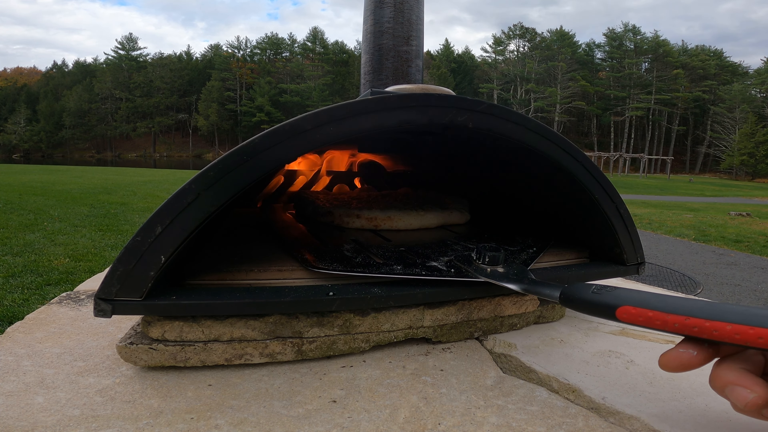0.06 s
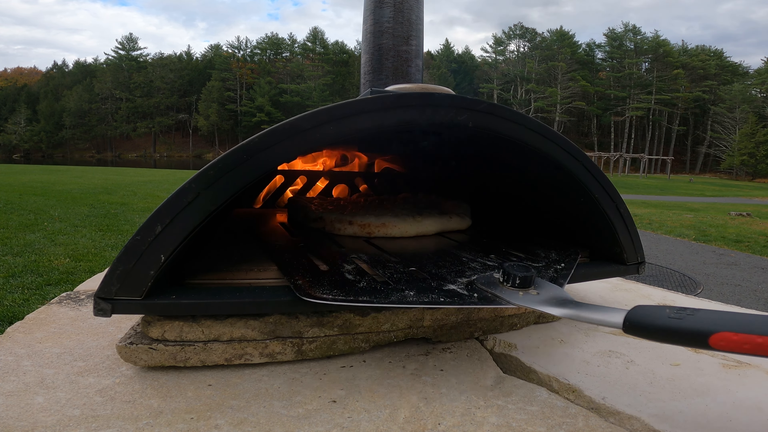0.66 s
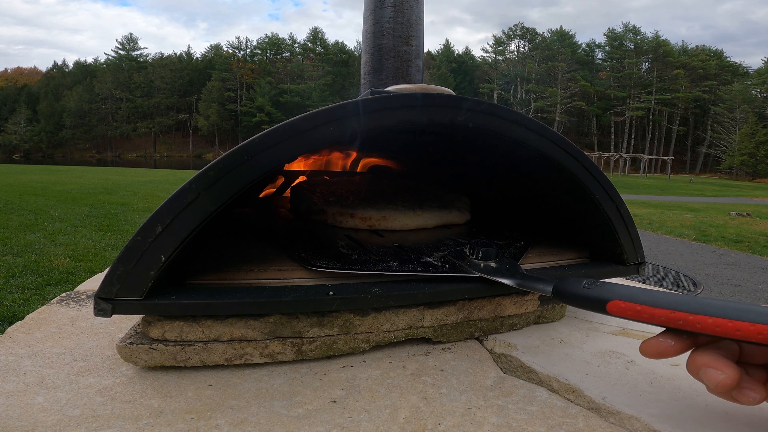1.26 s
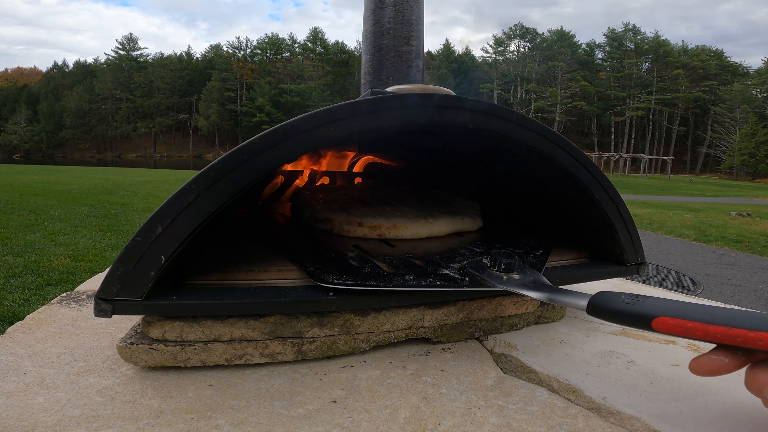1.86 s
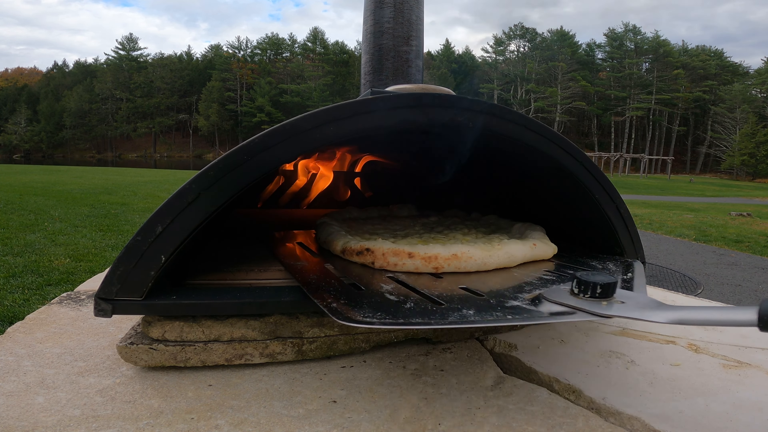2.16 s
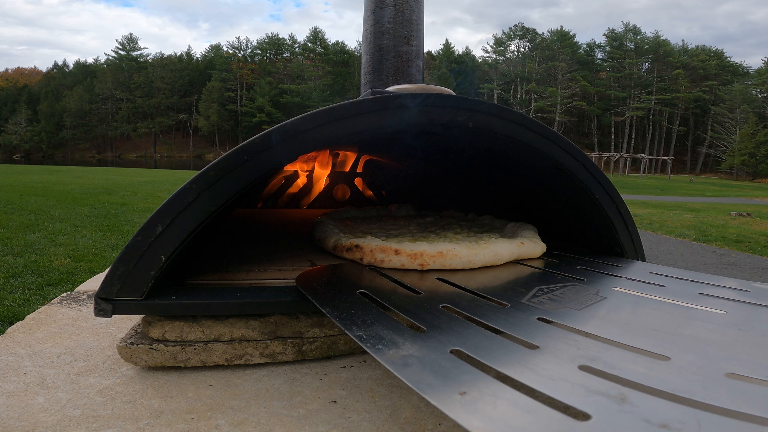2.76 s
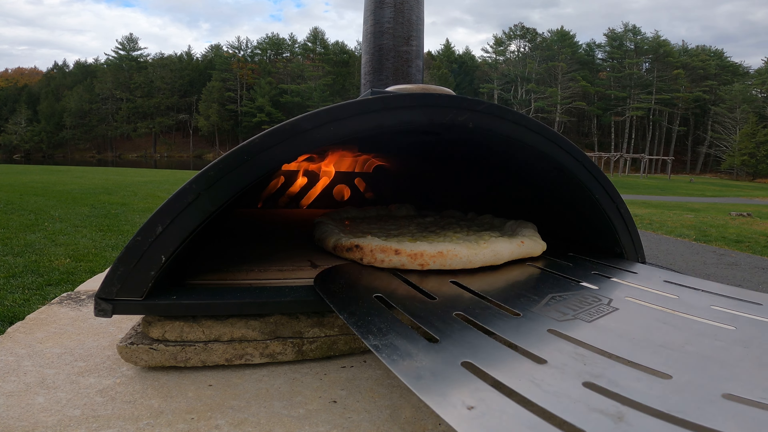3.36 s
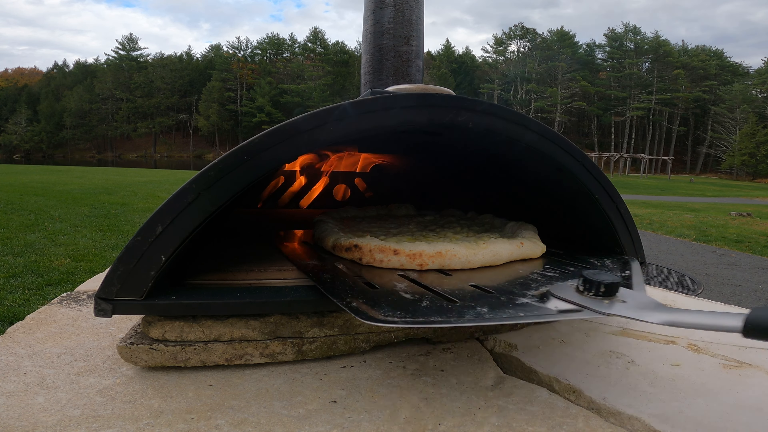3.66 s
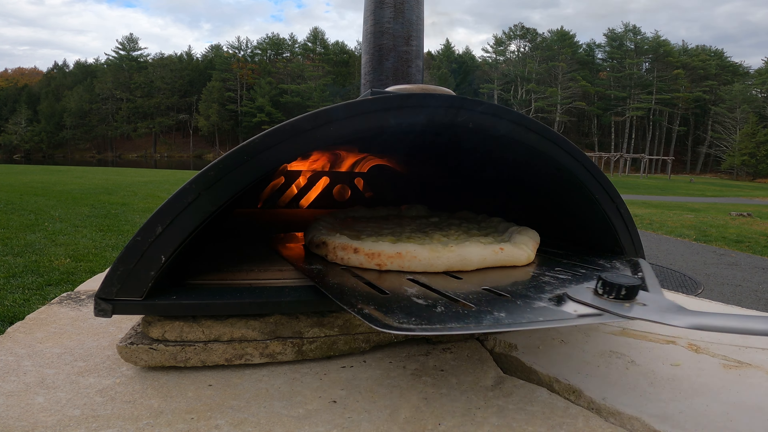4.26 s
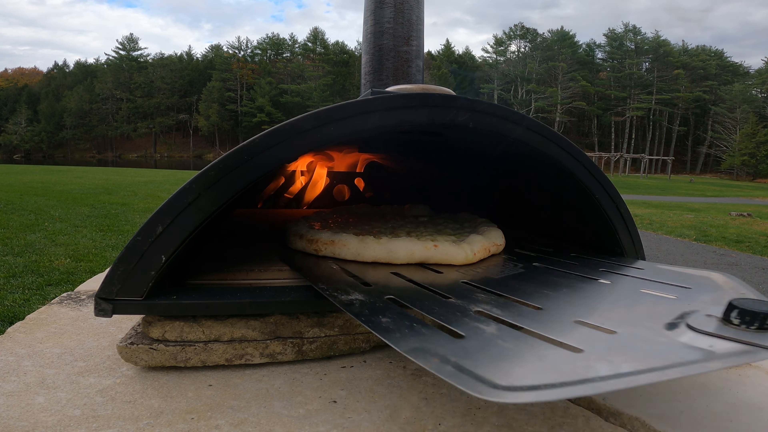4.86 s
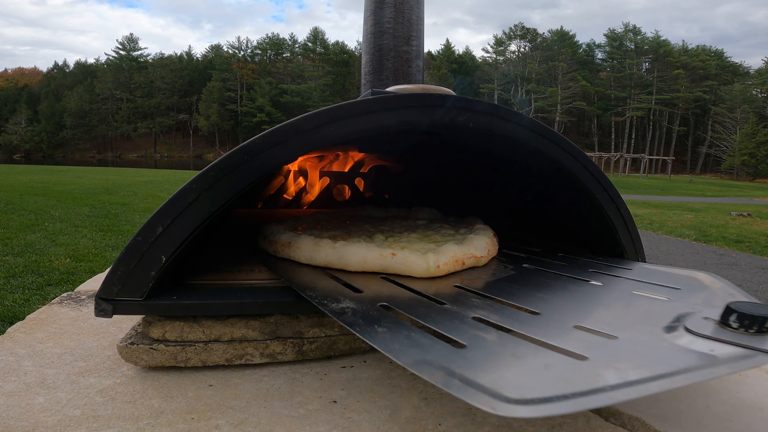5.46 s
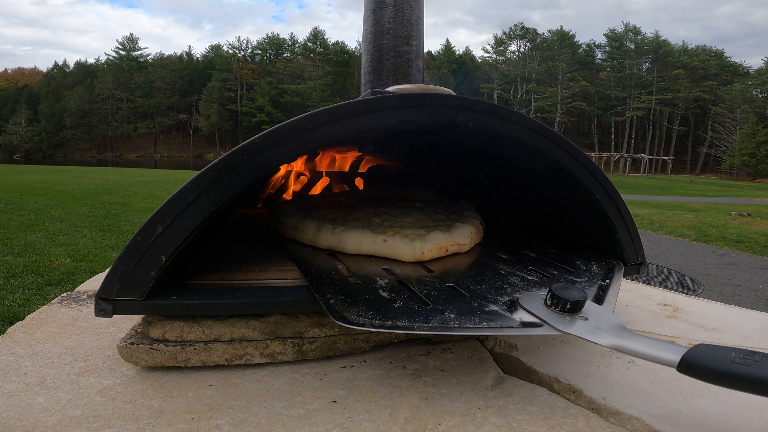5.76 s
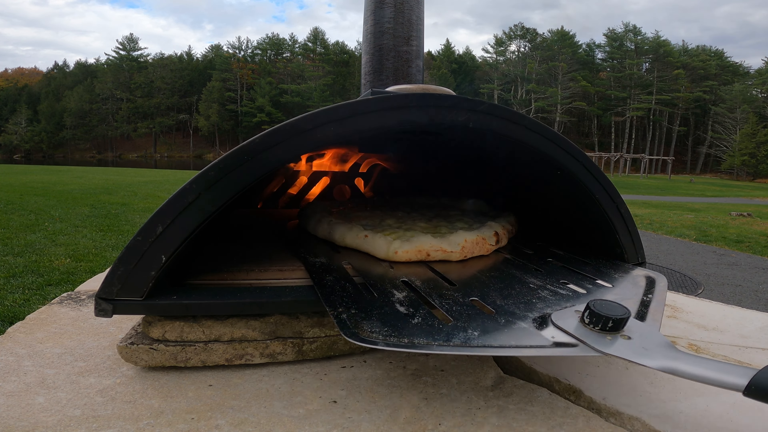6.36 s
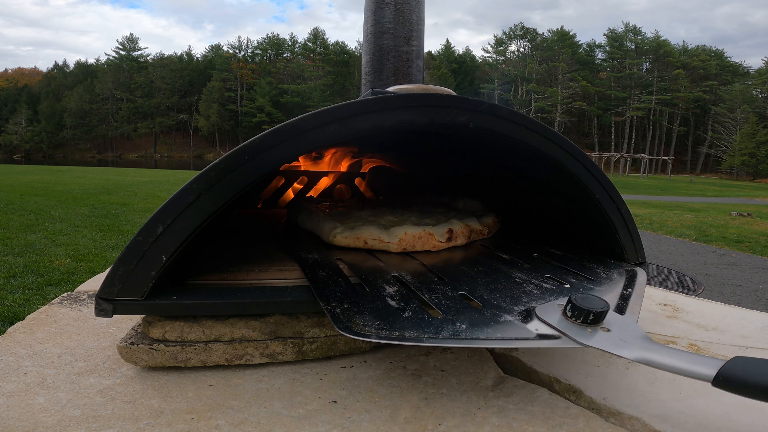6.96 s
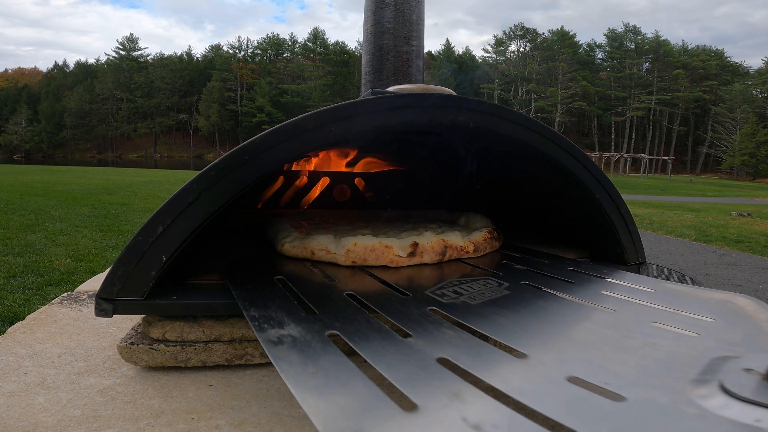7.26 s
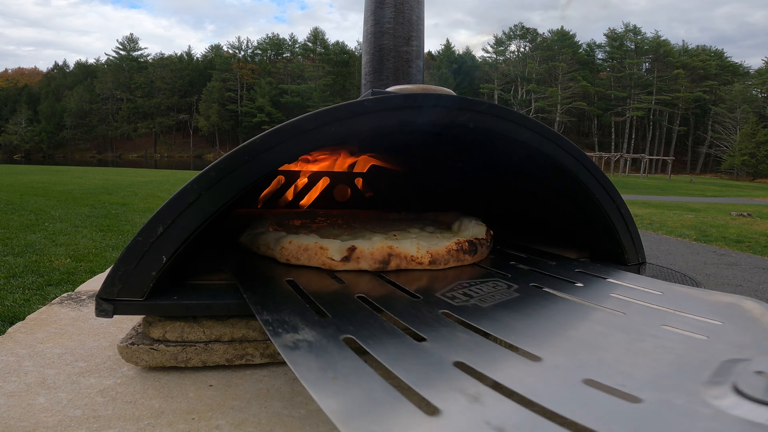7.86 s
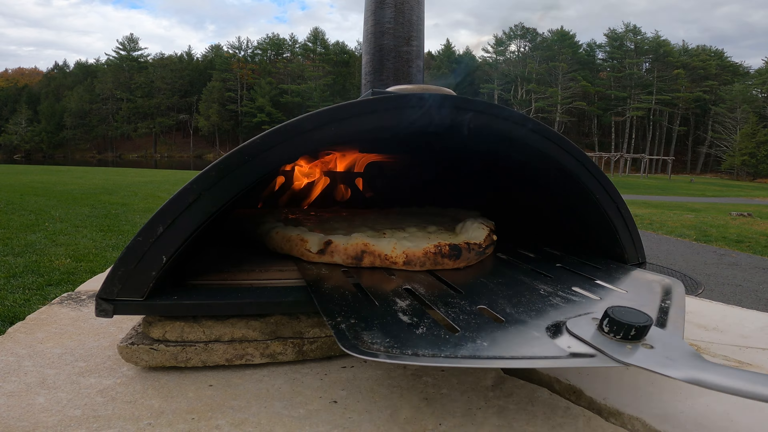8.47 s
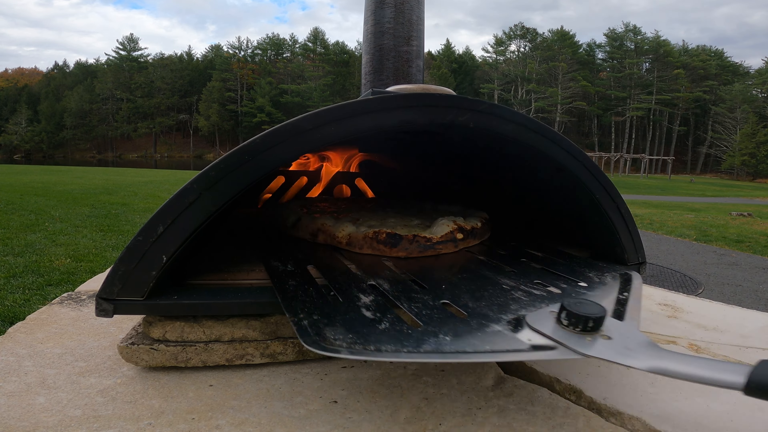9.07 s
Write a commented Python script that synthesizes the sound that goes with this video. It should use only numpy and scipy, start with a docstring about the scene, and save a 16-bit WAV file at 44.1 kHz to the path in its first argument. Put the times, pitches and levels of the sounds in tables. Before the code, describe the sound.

A metal pizza peel scrapes over gritty oven stone in repeated strokes, with clinks and thumps, over faint sizzling and a low burner.

```python
"""Outdoors at a small gas oven, a stereo microphone pair facing its mouth.
Straight ahead, a slotted metal peel is worked in and out, turning a pizza. The blade rasps over
the gritty stone, clinks on the oven mouth and thumps as blunt blows flex it. Between strokes
bubbles crackle on the pizza, the burner murmurs and light wind touches the microphones."""
import sys
import numpy as np
from scipy import signal
from scipy.fft import rfft, irfft
from scipy.io import wavfile

SR = 44100
rng = np.random.default_rng(int(sys.argv[2]) if len(sys.argv) > 2 else 0)


def to_wav(sig):
    """Store sig (one row per channel, or 1-D mono) as 16-bit WAV at the path in sys.argv[1].

    Samples outside -1..1 are clipped; the rate is SR.
    """
    pcm = np.clip(np.atleast_2d(sig), -1, 1) * 32767
    pcm = np.round(pcm).astype(np.int16)
    wavfile.write(sys.argv[1], SR, pcm.T)  # frames by channels


N = 401751
T = np.arange(N) / SR

# Pushes and pulls of the peel. Each row: start, fastest moment and end in seconds, speed at first
# touch from 0 to 1, then relative levels of rasp, grinding and shudder in dB.
STROKES = [(0.19, 0.21, 0.3, 0.4, -34.5, -43, -49.5), (0.359, 0.45, 1.2, 0.54, -38.5, -41.5, -34),
           (0.677, 0.821, 0.98, 0, -30.5, -37, -38), (0.932, 1.084, 1.24, 0.21, -26.5, -35.5, -34.5),
           (1.195, 1.228, 1.47, 0.4, -42.5, -43.5, -39.5), (1.82, 1.922, 2.7, 0.32, -35, -45.5, -52.5),
           (1.977, 2.253, 2.36, 0.05, -32.5, -40.5, -35.5), (2.31, 2.43, 2.683, 0.3, -28, -33, -42.5),
           (2.654, 2.728, 2.95, 0.28, -29, -37, -45), (2.942, 3.014, 3.14, .1, -34, -39, -49),
           (3.095, 3.126, 3.26, 0, -43, -46.5, -41.5), (3.489, 3.627, 3.88, 0.37, -25.5, -30.5, -39),
           (3.955, 4.064, 4.3, 0.33, -29.5, -38, -39), (4.142, 4.27, 4.52, 0.4, -30.5, -36.5, -39),
           (4.548, 4.641, 4.9, 0.08, -31.5, -42, -46), (4.729, 4.871, 5.15, 0.61, -25.5, -35.5, -36),
           (5.166, 5.411, 5.42, 0.19, -29, -42, -46), (5.38, 5.571, 5.69, 0.18, -24.5, -32, -44),
           (5.626, 5.752, 5.89, 0.09, -39, -41.5, -49), (5.883, 6.02, 6.225, 0.46, -26.5, -32.5, -37.5),
           (6.111, 6.222, 6.42, 0, -24.5, -33, -37), (6.441, 6.651, 6.96, 0.2, -24.5, -32.5, -43.5),
           (6.7, 6.8, 6.94, .1, -26, -44, -48), (6.839, 6.923, 7.08, 0.4, -34, -45, -36),
           (7.06, 7.334, 7.48, 0, -27, -38.5, -45), (7.387, 7.52, 7.71, 0.12, -25, -33, -35),
           (7.699, 7.966, 8.27, 0.11, -24.5, -34, -40), (8.083, 8.142, 8.34, 0.23, -27, -31.5, -31),
           (8.331, 8.44, 8.76, 0.13, -32.5, -41.5, -46.5), (8.56, 8.73, 9.29, 0.25, -27.5, -33.5, -37),
           (9.018, 9.142, 9.35, .1, -30, -48, -49)]
def stroke_gain(layer, swing_db, bite_s=0.0076, lift_s=0.011, flatness=2.16):
    """One layer's gain through the strokes: the blade bites, speeds up, slows and lifts off."""
    column = ("rasp", "grind", "shudder").index(layer)
    power = np.zeros(N)
    for start, fastest, end, first_speed, *levels in STROKES:
        span = slice(max(int(start * SR), 0), int(end * SR))
        t = T[span]
        slowness = 1 - np.interp(t, [start, fastest, end], [np.clip(first_speed, 0, 1), 1, 0])
        contact = np.clip(np.minimum((t - start) / bite_s, (end - t) / lift_s), 0, 1)
        power[span] += (contact * from_db(levels[column] - swing_db * slowness ** flatness)) ** 2
    return np.sqrt(power)


def reach_into_oven(traverse_s=0.3):
    """The strokes carry the blade to and fro: 0 at the mouth, 1 at the back of the oven."""
    speed = np.max([np.interp(T, stroke[:3], [0, 1, 0]) for stroke in STROKES], axis=0)
    return .5 + .5 * np.cos(np.pi * np.cumsum(speed) / SR / traverse_s)


# Fine and coarse grit on the stone. Each row: frequency in Hz, relative level in dB.
RASP_SPECTRUM = [(600, -24.5), (1400, -12.5), (2200, -3), (2800, -1), (3600, -3.5), (5500, -2.5),
                 (7400, -5), (8300, -9.5), (10600, -12), (12000, -15), (14500, -27), (15800, -60)]
GRIND_SPECTRUM = [(200, -23), (380, -2.5), (600, 2), (780, -3.5), (1000, 2.5), (1400, -1), (1950, -1.5),
                  (2800, -0.5), (4500, -12), (9000, -47)]
# Broad resonances of blade and oven mouth. Each row: centre in Hz, width in Hz, lift in dB.
RESONANCES = [(660, 45, 2), (926, 290, 2), (1810, 420, 0.5), (2454, 370, 0.5), (5500, 1000, 1.5),
              (12200, 340, 3)]
# Light contact between the quick strokes: start and end in seconds, relative level in dB.
RUBBING = (3.5, 9.2, -47.5)
def scraping(reach, judder_db=1.0, chatter_db=1.7, sheet_db=-8.0, gap_db=-8.5):
    """Grit breaks under the blade: fine grains rasp, coarse ones grind."""
    start, end, rubbing_db = RUBBING
    rubbing = from_db(rubbing_db) * (T > start) * (T < end)
    hand = from_db(drift(28))  # the hand never pushes quite evenly
    rasp_gain = hand * stalling() * np.hypot(stroke_gain("rasp", swing_db=21.5), rubbing)
    grind_gain = hand * np.hypot(stroke_gain("grind", swing_db=19), rubbing * from_db(-5.5))
    judder = drift(170)  # the blade catches and lets go
    fine = rms_one(colour(grains(16000, 1.9), RASP_SPECTRUM, RESONANCES))
    coarse = rms_one(colour(grains(5000, 1.83), GRIND_SPECTRUM, RESONANCES))
    # faster strokes break the grit more sharply
    sharpness = np.clip(0.039 * (20 * np.log10(rasp_gain + 1e-9) + 29.5), -.35, 1)
    fine = fine + sharpness * butterworth(fine, 1, 6000, "high")
    rasp = fine * rasp_gain * from_db(judder_db * judder)
    grind = coarse * grind_gain * from_db(0.5 + chatter_db * judder)
    rub = rasp + grind
    # narrow modes of the sheet and broad ones of the gap under the dome shift with the reach
    sheet = sliding_modes(rub, reach, t60=.11)
    gap = sliding_modes(rub, reach, t60=.008, count=7)
    return from_db(-1.47) * rub + from_db(sheet_db) * sheet + from_db(gap_db) * gap


# Bending modes of the peel. Each row: frequency in Hz, relative level in dB, t60 in seconds.
BENDING_MODES = [(85.5, -14, 0.25), (123.1, -16.5, 0.58), (161, -2, 0.22), (214.4, 0.5, 0.14),
                 (264, -2.5, 0.086), (345, -4.5, 0.053), (469, -2, 0.057), (617, -8, 0.085),
                 (870, -4.5, 0.013), (1063, -15, 0.088)]
# Blunt blows on the blade, and at 6.625 s a short judder as the blade catches and slips. Each row: time in
# seconds, peak level in dB, brightness in dB.
BLOWS = [(0.377, -13, -26), (0.393, -14.5, -13), (0.449, -16, -5.5), (0.548, -9, -27), (0.574, -10, -21),
         (0.64, -13.5, -15), (1.228, -22.5, -23), (1.255, -22.5, -13), (2.132, -18.5, 7), (3.044, -17.5, 2),
         (3.078, -17.5, -13), (3.567, -11.5, 4.5), (3.689, -16.5, 5), (3.855, -28, -25),
         (3.886, -25.5, -12), (4.12, -16.5, -17), (4.304, -5.5, -7.5), (4.342, -12, -8),
         (4.749, -20.5, -14), (4.924, -4.5, -6), (4.975, -13, -8), (5.573, -8, -12), (5.591, -15.5, -9),
         (6.252, -8.5, -9), (6.625, -22, -22), (6.817, -4, -2.5), (7.549, -6.5, -9), (8.131, -6.5, -9),
         (8.846, -4.5, -5), (8.923, -17, -12)]
def thumps(travel_s=0.00089, stiffening=0.11, release_s=0.0078, lead_s=0.00302, size=16384):
    """Blows flex the whole blade; high bending waves run faster, so each thump sweeps downward."""
    out, t = np.zeros(N), T[:size]
    upper_share = np.clip(np.log2(np.transpose(BENDING_MODES)[0] / 260), 0, 1)
    hz = np.arange(size + 1) * SR / (2 * size)
    dispersion = np.exp(-4j * np.pi * travel_s * np.sqrt(200 * hz))
    # the pressed blade is stiffer at first; its pitch sinks as the contact lets go
    sagging_t = t + stiffening * release_s * (1 - np.exp(-t / release_s))
    for s, db, bright_db in BLOWS:
        extra_db = upper_share * 0.94 * (bright_db + 9) + rng.normal(0, 0.43, len(BENDING_MODES))
        modes = alternating_sum(ring(BENDING_MODES, sagging_t * rng.normal(1, 0.0443), extra_db))
        blow = irfft(rfft(modes, 2 * size) * dispersion)[:size]
        add(out, s - lead_s, at_peak(blow, db))  # a blunt blow takes a moment to swell
    return out


def after_rumble(relative_db=-28.5, late_s=0.066, half_width_s=0.047):
    """The slowest bending waves arrive last: a soft rumble follows each thump."""
    rumble = rms_one(butterworth(rng.standard_normal(N), 2, [45, 130], "band"))
    return rumble * swells([(s + late_s, half_width_s, db + relative_db) for s, db, _ in BLOWS])


def stalling(dip_db=3.0, deepest_s=0.035, hard_blow_db=-4.0):
    """A hard thump stops the blade short: the gain of its rasp dips for a moment."""
    dips, t = np.zeros(N), T[:SR // 4]
    dip = t / deepest_s * np.exp(1 - t / deepest_s)
    for s, db, _ in BLOWS:
        add(dips, s, min(from_db(db - hard_blow_db), 1) * dip)
    return from_db(-dip_db * dips)


def shudder(level_db=-0.5, fitful_db=3.0):
    """Small slips keep the bending modes stirring, in fits and starts."""
    body = alternating_sum(ring(BENDING_MODES, T[:SR // 3]))
    slips = grains(900, 2.3) * from_db(fitful_db * drift(22))
    spectrum = [(110, -0.5), (166, -6.5), (230, -1), (320, -1), (500, -10), (1000, -6.5)]
    stirred = rms_one(colour(through(slips, body), spectrum))
    return stirred * stroke_gain("shudder", swing_db=15.5) * from_db(level_db)


# Ringing modes of the blade. Each row: frequency in Hz, relative level in dB, t60 in seconds.
RINGING_MODES = [(1090, -10.5, 0.097), (1131, -2, 0.05), (1700, -15.5, 0.086), (2000, -10, 0.1),
                 (2184, -5, 0.047), (2714, -5, 0.057), (3820, -10, 0.086), (4620, -0.5, 0.021),
                 (5380, -14, 0.028), (6290, -6.5, 0.042)]
# The crack of contact. Each row: frequency in Hz, relative level in dB.
CRACK_SPECTRUM = [(300, 2), (780, 1.5), (1100, 7), (1550, -0.5), (2200, 2.5), (3000, 0), (6500, 0.5),
                  (9000, -10.5), (12500, -14), (16000, -39)]
# The edge meets steel or stone. Each row: start in seconds, peak level in dB, brightness in dB.
EDGE_STRIKES = [(0.404, -19, -11), (0.4512, -15.5, -10.5), (0.5865, -4.5, -13), (0.6387, -15, -2.5),
                (2.1336, -9.5, -13.5), (3.0423, -15, -9), (4.1205, -6.5, -5), (4.3018, -11.5, -10),
                (4.339, -13, -14), (4.7492, -8.5, -9.5), (4.9211, -11.5, -10.5), (5.3773, -14.5, -23),
                (5.5712, -7.5, -2.5), (6.815, -11.5, -22), (7.6039, -8, -7), (8.1268, -7.5, -7),
                (8.2312, -11, -1.5), (8.4267, -19.5, -8), (8.6047, -14, -9), (8.813, -9, -11.5),
                (8.8453, -13.5, -11), (8.9248, -9.5, -4)]
def clinks(bounce_db=-4.0, rattle_t60=0.36):
    """The edge strikes, touches again within milliseconds, and the blade rings and rattles briefly."""
    out, t = np.zeros(N), T[:8192]
    count = len(RINGING_MODES)
    strike = 2.6 * dying(t, .02)
    rattle = .3 * dying(t, rattle_t60)
    for s, db, bright_db in EDGE_STRIKES:
        tones = rng.choice([-1, 1], count) @ ring(RINGING_MODES, t, rng.normal(0, 0.56, count))
        bounce = from_db(bounce_db) * np.interp(t - rng.uniform(0.0032, 0.0058), t, strike, left=0)
        crack = colour(rng.standard_normal(len(t)) * (strike + bounce + rattle), CRACK_SPECTRUM)
        clink = colour(tones + crack, [(2500, 0), (6000, bright_db + 7.5)])
        add(out, s, at_peak(clink, db))
    return out


# One hard drag over the oven lip: start and end in seconds, rms level in dB.
LIP_DRAG = (3.565, 3.708, -25)
# Edge modes that sing only in the drag. Each row: frequency in Hz, relative level in dB, t60 in seconds.
SQUEAL_MODES = [(1416, 0, 0.06), (1918, -3.5, 0.048)]
def dragging(slips_per_s=190, band_hz=(330, 2600)):
    """Under load the blade sticks and slips in quick uneven jerks, each striking its modes."""
    start, end, db = LIP_DRAG
    slip_count = np.floor(np.cumsum(slips_per_s * from_db(1.6 * drift(45))) / SR)
    slips = np.diff(slip_count, prepend=0) * from_db(2 * drift(200)) * (T > start) * (T < end)
    blade = alternating_sum(ring(BENDING_MODES + RINGING_MODES + SQUEAL_MODES, T[:SR // 10]))
    chatter = butterworth(through(slips, blade), 2, band_hz, "band")
    return from_db(db) * rms_one(chatter) * np.sqrt((end - start) / T[-1])


# The pizza crackling inside the oven. Each row: time in seconds, level in dB.
SIZZLE_LEVELS = [(0, -47), (.15, -40.5), (.25, -45.5), (1.5, -49), (3.3, -55), (5, -65)]
# Its louder pops. Each row: start in seconds, peak level in dB.
POPS = [(0.035, -28), (0.139, -34), (0.2827, -24), (0.3451, -26.5), (1.48, -31.5), (1.769, -21.5),
        (1.834, -23), (1.858, -22.5), (3.42, -29.5)]
# A bursting bubble. Each row: frequency in Hz, relative level in dB.
BUBBLE_SPECTRUM = [(800, -28), (2000, -6), (3500, 1.5), (6800, 2), (9500, -4.5), (12200, -8.5),
                   (16000, -26)]
def sizzle(pop_t60=0.0037, dome_db=-18.0, dome_t60=0.16):
    """Tiny bubbles burst on the hot pizza, each a short spit that echoes in the dome; a few stand out."""
    level_db = np.interp(T, *np.transpose(SIZZLE_LEVELS))
    t = T[:SR // 20]
    spit = dying(t, pop_t60) + from_db(dome_db) * dying(t, dome_t60)
    burst_power = np.abs(through(grains(120, 3.8) ** 2, spit ** 2))
    spits = np.sqrt(burst_power) * rng.standard_normal(N)
    out = from_db(level_db) * rms_one(colour(spits, BUBBLE_SPECTRUM))
    for s, db in POPS:
        pop = colour(spit * rng.standard_normal(len(t)), BUBBLE_SPECTRUM)
        add(out, s, at_peak(pop, db))
    return out


# The gas flame, low in the background. Each row: frequency in Hz, relative level in dB.
FLAME_SPECTRUM = [(35, -30), (60, 5), (279, -5.5), (588, -15.5), (853, -18), (1050, -13), (1840, -20),
                  (2730, -16.5), (4350, -22.5), (6770, -21.5), (12100, -31), (14600, -46), (15700, -40)]
def burner(mid_db=-49.0, width_db=-8.0):
    """The flame murmurs and hisses steadily, a little different at each microphone."""
    mid, side = [rms_one(colour(rng.standard_normal(N), FLAME_SPECTRUM)) for _ in range(2)]
    return from_db(mid_db) * (mid + from_db(width_db) * np.array([side, -side]))


# Wind rumble at the microphones. Each row: frequency in Hz, relative level in dB.
WIND_SPECTRUM = [(12, -1), (25, -7.5), (40, 1), (65, -6), (110, -9), (200, -19.5), (400, -69)]
# Gusts over the breeze. Each row: centre and half-width in seconds, level in dB.
GUSTS = [(0.52, .13, -33), (1.14, 0.023, -36), (1.75, .035, -28.5), (1.86, 0.023, -34), (3.1, .05, -33),
         (3.42, 0.12, -37.5), (7.5, 0.06, -36), (8.27, .17, -25), (8.7, .2, -30), (9.1, 0.045, -26.5)]
def wind(breeze_db=-45, own_db=-4.5, lean_db=1.5, eddy_db=3.0):
    """Eddies right at the microphones, partly different at each and stronger on the right."""
    strength = np.hypot(from_db(breeze_db), swells(GUSTS))
    shared, left, right = [rms_one(colour(rng.standard_normal(N), WIND_SPECTRUM)) for _ in range(3)]
    rumble = rms_one(shared + from_db(own_db) * np.array([left, right]))
    return rumble * strength * from_db(eddy_db * drift(14)) * from_db([[-lean_db], [lean_db]])


# Stereo width at the pair. Each row: frequency in Hz, side against mid in dB.
STEREO_WIDTH = [(100, -2), (300, -18), (800, -16.5), (1500, -16.5), (2800, -10), (4200, -9), (6000, -45),
                (10000, -69), (12000, -2.5), (15000, 0)]
# Balance at the pair. Each row: frequency in Hz, left minus right in dB.
BALANCE = [(60, 2), (130, -2), (290, -0.4), (640, -0.9), (1410, -2.2), (3100, -2.5), (6820, 0),
           (15000, -0.5)]
def microphone_pair(mid, reach, echo_t60=0.078):
    """Reflections from oven and table reach each microphone differently and change as the blade moves."""
    side = colour(sliding_modes(mid, reach, echo_t60), STEREO_WIDTH)
    left = colour(mid + side, [(hz, db / 2) for hz, db in BALANCE])
    right = colour(mid - side, [(hz, -db / 2) for hz, db in BALANCE])
    return np.array([left, right])


def sliding_modes(x, reach, t60, count=13, size=8192):
    """As the blade moves, one cloud of close modes and echoes gives way to the next."""
    out = 0
    for k in range(count):
        nearness = np.clip(1 - np.abs(reach * (count - 1) - k), 0, 1)
        cloud = rng.standard_normal(size) * dying(T[:size], t60)
        out = out + through(x * np.sqrt(nearness), cloud / np.linalg.norm(cloud))
    return out


def ring(modes, t, extra_db=0):
    """One decaying sine for each mode."""
    hz, db, t60 = np.transpose(modes)
    return from_db(db + extra_db)[:, None] * np.sin(2 * np.pi * hz[:, None] * t) * dying(t, t60[:, None])


def alternating_sum(sines):
    """Sum modes with neighbours in opposite polarity."""
    return (-1) ** np.arange(len(sines)) @ sines


def grains(per_s, spread_db):
    """Random clicks of uneven size."""
    sizes = from_db(spread_db * np.minimum(rng.exponential(1, N), 4)) * rng.choice([-1, 1], N)
    return sizes * (rng.random(N) < per_s / SR)


def drift(per_s):
    """A random wander of unit rms that turns so many times a second."""
    return rms_one(np.interp(T * per_s, np.arange(N // 20), rng.standard_normal(N // 20)))


def swells(rows):
    """Joint gain of bell-shaped swells. Each row: centre and half-width in seconds, level in dB."""
    powers = (from_db(db) ** 2 * np.exp(-np.minimum(((T - s) / half) ** 2, 20)) for s, half, db in rows)
    return np.sqrt(sum(powers))


def colour(x, spectrum, peaks=(), size=4096):
    """Minimum-phase filter with the given spectrum and resonant lifts."""
    hz = np.arange(size // 2 + 1) * SR / size
    point_hz, point_db = np.transpose(spectrum)
    db = np.interp(np.log(hz + 1), np.log(point_hz), point_db)
    db += sum(lift / (1 + (2 * (hz - centre) / width) ** 2) for centre, width, lift in peaks)
    cepstrum = irfft(np.log(from_db(db)))
    cepstrum[1:size // 2] *= 2
    cepstrum[size // 2 + 1:] = 0
    return through(x, irfft(np.exp(rfft(cepstrum))))


def butterworth(x, order, hz, kind):
    """Filter with a flat passband."""
    return signal.sosfilt(signal.butter(order, hz, kind, fs=SR, output="sos"), x)


def through(x, response):
    """Convolve and keep the length."""
    return signal.oaconvolve(x, response)[:len(x)]


def dying(t, t60):
    """Decay by 60 dB every t60 seconds."""
    return from_db(-60 * t / t60)


def from_db(db):
    """Decibels to gain."""
    return 10 ** (np.asarray(db) / 20)


def rms_one(x):
    """Scale to unit rms."""
    return x / np.sqrt(np.mean(x ** 2) + 1e-20)


def at_peak(x, db):
    """Scale to a peak level."""
    return x / np.abs(x).max() * from_db(db)


def add(track, s, sound):
    """Mix a sound in at s seconds."""
    start = max(int(s * SR), 0)
    track[start:start + len(sound)] += sound[:N - start]


def scene():
    """Peel and oven straight ahead, wind on the microphones."""
    reach = reach_into_oven()
    peel = scraping(reach) + shudder() + dragging() + thumps() + after_rumble() + clinks()
    return microphone_pair(peel + sizzle(), reach) + burner() + wind()


def record(dry):
    """The treble is cut steeply above 15.7 kHz."""
    return signal.sosfilt(signal.ellip(10, .1, 90, 15700, fs=SR, output="sos"), dry)


dry = scene()
out = record(dry)
to_wav(out)
```